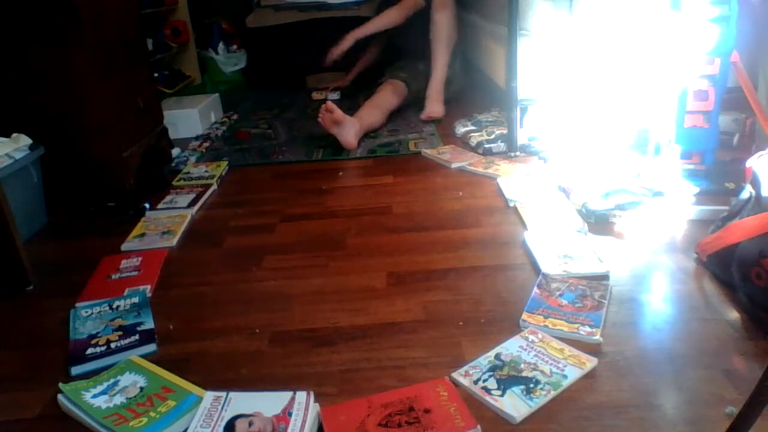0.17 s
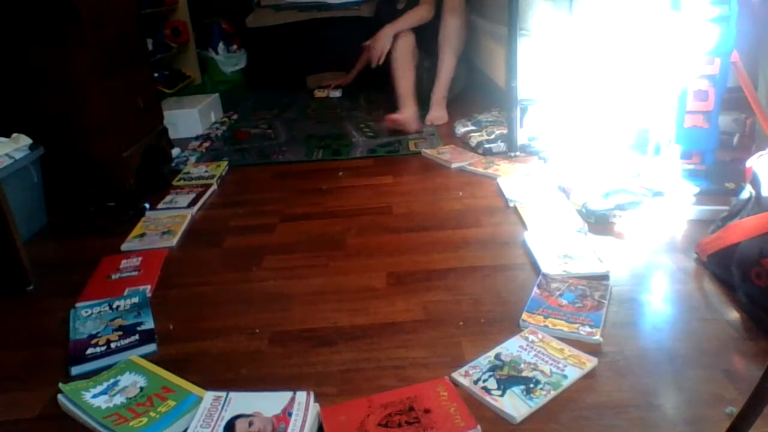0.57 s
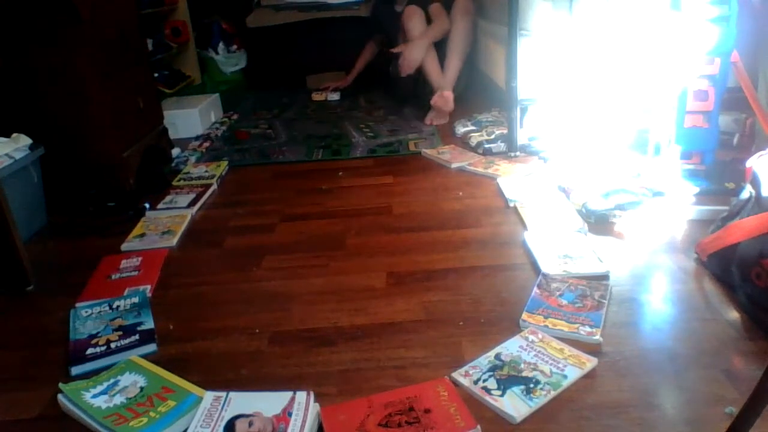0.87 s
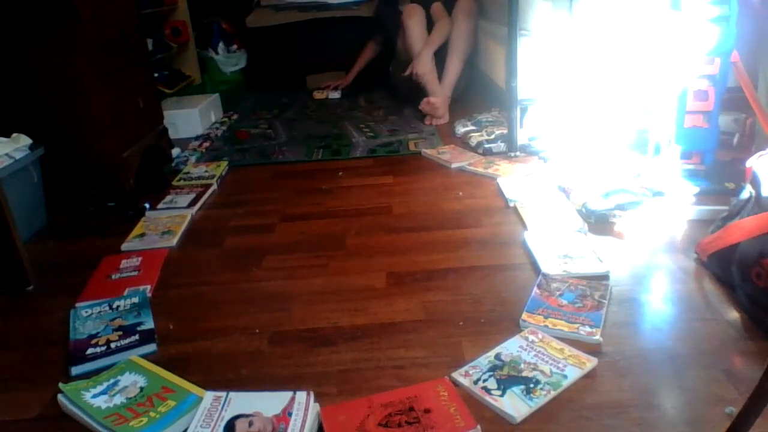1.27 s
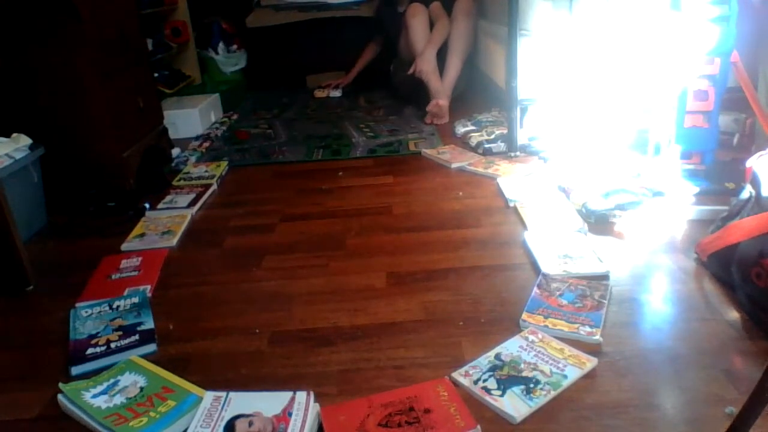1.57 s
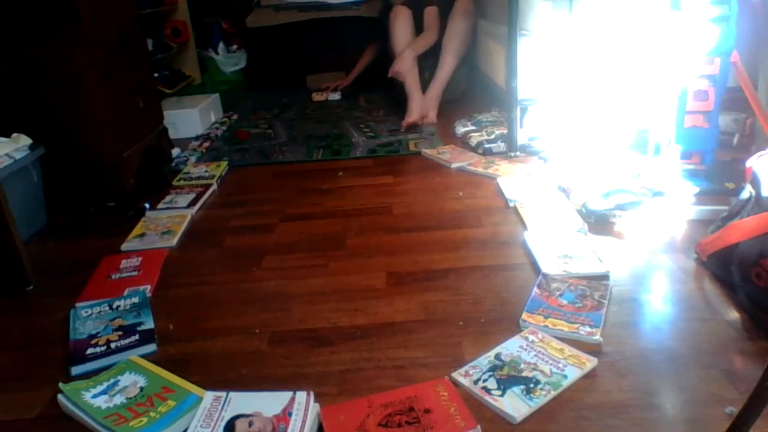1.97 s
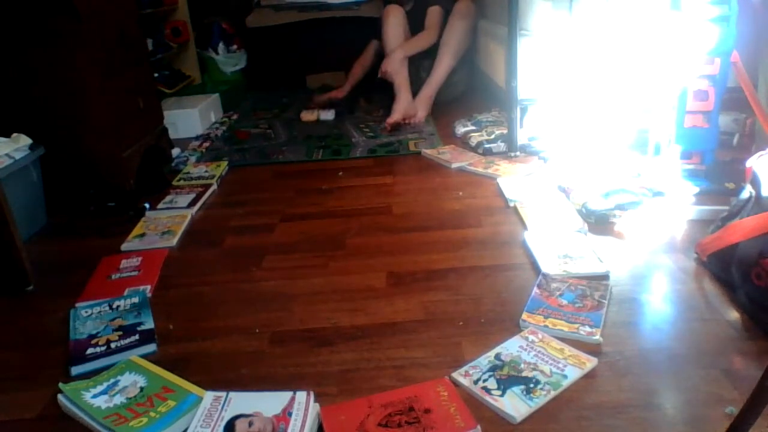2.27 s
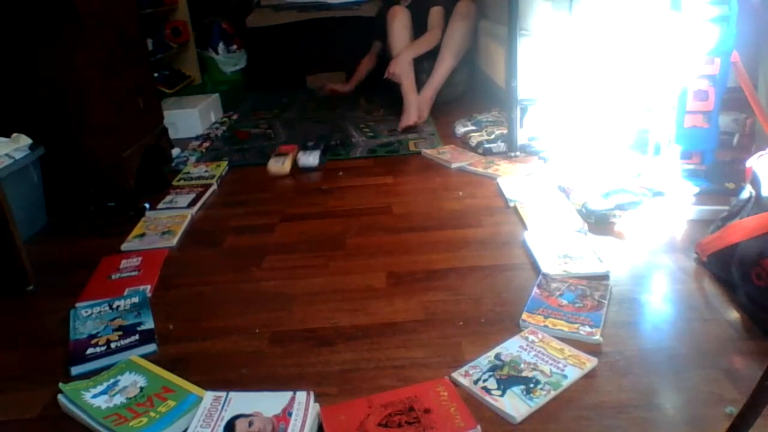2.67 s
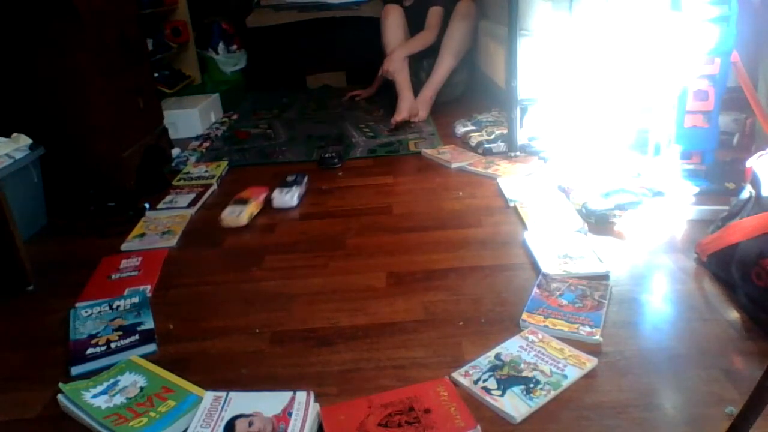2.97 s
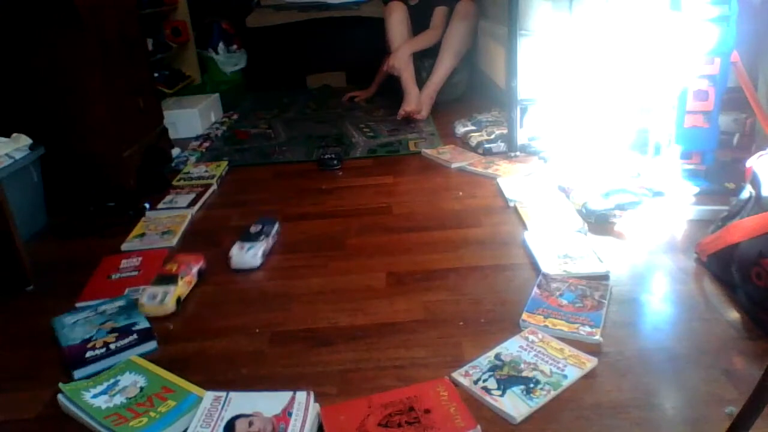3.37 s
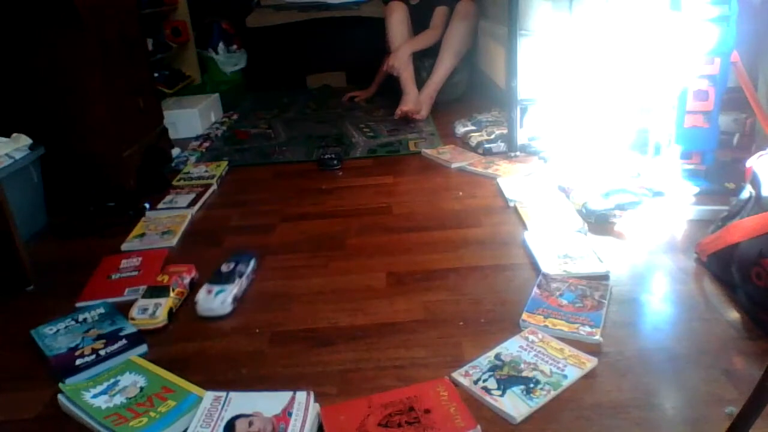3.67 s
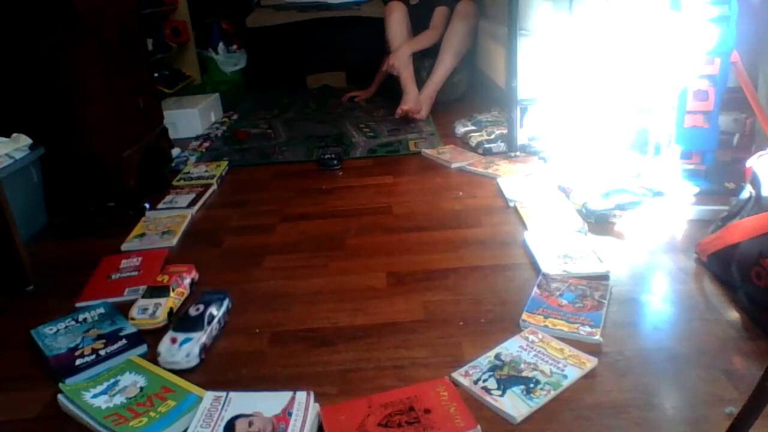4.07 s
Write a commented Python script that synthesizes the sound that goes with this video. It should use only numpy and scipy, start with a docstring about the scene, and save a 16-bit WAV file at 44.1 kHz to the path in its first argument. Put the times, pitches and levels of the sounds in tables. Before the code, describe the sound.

Two small metal toy cars click faintly on a rug, then roll rattling loudly across hollow hardwood and bump to a stop against books.

```python
"""Over a quiet room tone, two small metal toy cars are handled on a rug: ringing clacks, cloth rustle, floor sway.
Pushed off, they roll: random clicks of loose wheels excite the modes of axles, base, shell and hollow boards.
Off the rug the shell and boards speak louder, knocks bounce, planks flex and the floor panel booms.
At the end they bump against books and lurch to a stop. Sparse echoes give the small room throughout."""
import sys
import numpy as np
from scipy import signal
from scipy.io import wavfile
from scipy.ndimage import uniform_filter1d

SR = 44100
rng = np.random.default_rng(int(sys.argv[2]) if len(sys.argv) > 2 else 0)


def materialize(psi):
    """Save the field psi as 16-bit PCM at rate SR to the path in sys.argv[1].

    A 1-D psi becomes a single channel; in a 2-D psi each row is a channel.
    """
    bounded = np.clip(np.atleast_2d(psi).T, -1, 1)
    quanta = np.round(bounded * 32767).astype(np.int16)
    wavfile.write(sys.argv[1], SR, quanta)


def ratio_of_db(decibels):
    """Turn decibels (scalar or array-like) into linear amplitude factors; 0 dB maps to 1."""
    return 10 ** (np.asarray(decibels, float) / 20)


N = 185528


def evened(x):
    """Scales to rms 1."""
    return x / np.sqrt(np.mean(x ** 2) + 1e-20)


def drift(samples):
    """Slow random wander, rms 1: noise smoothed twice."""
    once = uniform_filter1d(rng.standard_normal(N), samples)
    return evened(uniform_filter1d(once, samples))


def follow(rows):
    """Columns of a curve table as gains per sample, silent outside the table."""
    s, *columns = np.transpose(rows)
    t = np.arange(N) / SR
    return [ratio_of_db(np.interp(t, s, column, left=-120, right=-120)) for column in columns]


def colour(x, points):
    """Causal minimum-phase filter with the given spectrum, interpolated over log frequency."""
    f, db = np.transpose(points)
    hz = abs(np.fft.fftfreq(16384, 1 / SR))
    curve_db = np.interp(np.log(hz + 1), np.log(f + 1), db)
    log_gain = np.log(ratio_of_db(np.maximum(curve_db, -100)))
    impulse = np.fft.ifft(np.exp(np.conj(signal.hilbert(log_gain)))).real[:8192]
    return signal.oaconvolve(x, impulse)[:N]


def ring(x, modes):
    """Modes that start softly and die away, struck by x; white noise keeps its rms."""
    t = np.arange(SR // 8) / SR
    impulse = np.zeros(len(t))
    for hz, width, db in modes:
        envelope = width ** 1.5 * t * np.exp(-np.pi * width * t)
        impulse += ratio_of_db(db) * envelope * np.sin(2 * np.pi * hz * t)
    return signal.oaconvolve(x, impulse / np.linalg.norm(impulse))[:N]


def chatter(per_s, spread_db, clump_db):
    """Random clicks of uneven size that come in clumps, rms 1."""
    size = ratio_of_db(spread_db * np.minimum(rng.exponential(1, N), 4)) * rng.choice([-1, 1], N)
    present = rng.random(N) < per_s / SR
    return evened(size * present * ratio_of_db(clump_db * drift(400)))


def rattle(x, modes, wander_db):
    """Each touch lands on another spot and loose parts meet in turn, so every mode comes and goes on its own."""
    out = np.zeros(N)
    for hz, width, db in modes:
        touch = x * rng.choice([-1, 1], N) * ratio_of_db(wander_db * drift(800))
        out += ratio_of_db(db) * ring(touch, [(hz, width, 0)])
    return out / np.linalg.norm([ratio_of_db(db) for _, _, db in modes])


def strikes(rows, modes, rise_s, t60_s, level_db):
    """Single clean strikes: a few modes start at once and die quickly, the higher ones sooner."""
    out, t = np.zeros(N + SR), np.arange(SR // 8) / SR
    rise = np.minimum(t / rise_s, 1)
    for s, db, hz in rows:
        rings = sum(ratio_of_db(part_db - 60 * k * t / t60_s) * np.sin(2 * np.pi * k * hz * t) for k, part_db in modes)
        out[round(s * SR):][:len(t)] += ratio_of_db(db + level_db) * rise * rings
    return out[:N]


# colour of the room hiss: [f/Hz, level/dB]
HISS_COLOUR = [(12, -6), (30, 5.5), (110, -10.5), (220, -17.5), (400, -24.5), (700, -24.5), (1400, -26),
               (3000, -38), (6000, -40), (14000, -27), (16500, -28)]
# faint hum: [f/Hz, level/dB]
HUM_TONES = [(178.6, -67)]


def room_tone():
    """Steady hiss of filtered noise and a faint sine hum."""
    t = np.arange(N) / SR
    hum = sum(np.sqrt(2) * ratio_of_db(db) * np.sin(2 * np.pi * hz * t) for hz, db in HUM_TONES)
    hiss = ratio_of_db(-56) * evened(colour(rng.standard_normal(N), HISS_COLOUR))
    return hiss, hum


# reverberation of the small room: [f/Hz, t60/s]
ROOM_DECAY = [(200, 0.63), (1000, 0.22), (4000, 0.2), (15000, 0.18)]


def tail(gap_s):
    """Sparse echoes of random sign, each band dying at its own speed."""
    echoes = np.zeros(SR // 2)
    at = np.arange(0, len(echoes) - 20, 20)
    echoes[at + rng.integers(0, 20, len(at))] = rng.choice([-1., 1.], len(at))
    hz, t, z = signal.stft(echoes, SR, nperseg=256)
    f, t60 = np.transpose(ROOM_DECAY)
    decay = np.maximum(np.interp(np.log(hz + 1), np.log(f), t60), .03)
    echoes = signal.istft(z * ratio_of_db(-60 * t / decay[:, None]), SR, nperseg=256)[1]
    return np.pad(echoes / np.linalg.norm(echoes), (round(gap_s * SR), 0))


def room(x, gap_s):
    """The cars move, so the echo pattern keeps changing: three tails take turns."""
    turn = np.arange(N) / SR * 7.0  # radians
    weights = [np.cos(turn) ** 2, np.sin(turn) ** 2, np.sin(2 * turn) / np.sqrt(2)]
    return sum(signal.oaconvolve(x * w, tail(gap_s))[:N] for w in weights)


# weight on the floor panel: [t/s, swing level/dB, upper mode's share level/dB]
PANEL_LOAD = [(1.75, -70, -19), (1.82, -67, 3), (1.91, -43.5, -11), (2.02, -34, 3.5), (2.04, -31.5, -5),
              (2.23, -25, -3), (2.32, -30.5, -1.5), (2.79, -29.5, -6), (2.81, -20, 1.5), (3.05, -29, -3.5),
              (3.1, -26.5, 4.5), (3.13, -34.5, 0.5), (3.35, -29, -0.5), (3.46, -43, -3),
              (4.14, -47.5, -5.5), (4.2, -61, -29)]
# floor panel modes: [f/Hz, width/Hz]
PANEL_MODES = [(42, 18.5), (85, 34.7)]
# planks carry more as the cars come near: [t/s, level/dB]
PLANK_CARRY = [(1.8, -8), (2.6, -7.5), (2.8, -5), (3.4, -9), (4.21, 9.5)]
# single planks flexing: [f/Hz, width/Hz, level/dB]
PLANK_MODES = [(151, 104, 7), (221.5, 57, -5.5), (229.5, 152, 5), (321, 82, -5.5)]


def floor_boom():
    """The uneven tread keeps the floor panel swinging near its two pitches and flexes the planks."""
    load, upper = follow(PANEL_LOAD)
    levels = [load * np.sqrt(np.maximum(1 - upper ** 2, .01)), load * upper]
    board_flurry = knocks()[0][3]
    flex = ratio_of_db(-14.5) * rolling() * follow(PLANK_CARRY)[0] + ratio_of_db(-12.5) * board_flurry
    out = flex * ring(rng.standard_normal(N), PLANK_MODES)
    for level, (hz, width) in zip(levels, PANEL_MODES):
        wandering_hz = hz + 0.293 * width * drift(1500)
        swing = np.sin(2 * np.pi * np.cumsum(wandering_hz) / SR)
        shudder = evened(ring(rng.standard_normal(N), [(hz, width, 0)]))
        out += level * (0.69 * swing + 0.64 * shudder)
    return out


# movement on the rug, also used by cars(): [t/s, hand jostling level/dB, sitter shifting weight level/dB]
RUG_MOVES = [(0.0, -53.5, -60), (0.058, -73, -55), (0.118, -60, -47), (0.2, -64, -54.5), (0.33, -62, -35.5),
             (0.444, -54, -40), (0.51, -66, -45.5), (0.64, -54, -49), (0.8, -64, -52), (0.966, -61, -45.5),
             (1.05, -58, -65), (1.134, -73, -48), (1.204, -60.5, -52), (1.55, -73, -59.5),
             (1.606, -58.5, -67), (1.7, -69.5, -53.5), (1.82, -55, -57), (1.95, -48, -48.5)]
# colour of cloth and feet on the rug: [f/Hz, level/dB]
RUSTLE_COLOUR = [(180, -68), (300, -39), (584, -2), (915, -33), (1250, 0), (1610, -8.5), (10900, -6.5),
                 (16000, -8.5)]
# colour of the floor's sway: [f/Hz, level/dB]
SWAY_COLOUR = [(4.7, -7.5), (8.0, 9.5), (28, -11), (65, -11), (92, -15.5), (150, -41), (160, -46),
               (210, -51), (350, -120)]
# heels shifting weight on the boards: [t/s, level/dB, f/Hz]
HEEL_THUDS = [(0.307, -27, 22), (0.40, -57, 13), (0.496, -36.5, 12.5), (0.607, -34.5, 23),
              (0.905, -36.5, 59), (1.055, -35.5, 19)]


def sitter():
    """Cloth and feet brush the rug as filtered clicks; shifting weight sways the floor as low noise and pulses."""
    hand, shift = follow(RUG_MOVES)
    rustle = ratio_of_db(-9.5) * hand + ratio_of_db(-13) * shift
    brush = rustle * evened(colour(chatter(12000, 0.98, 1.7), RUSTLE_COLOUR))
    heels, t = np.zeros(N), np.arange(N) / SR
    for s, db, hz in HEEL_THUDS:
        heels += ratio_of_db(db) * np.cos(2 * np.pi * hz * (t - s)) * np.exp(-(2.0 * hz * (t - s)) ** 2)
    sway = ratio_of_db(2.0) * shift * evened(colour(rng.standard_normal(N), SWAY_COLOUR))
    return brush, heels + sway


# the roll, then a slow creep once the wheels stall: [t/s, wheel chatter level/dB]
ROLL_LEVEL = [(1.8, -95), (1.95, -47.5), (2.03, -40), (2.08, -36.5), (2.14, -36.5), (2.29, -25.5),
              (2.5, -28), (2.59, -28), (2.69, -23.5), (2.73, -19), (2.8, -17.5), (2.84, -20.5),
              (2.89, -20.5), (3.05, -27.5), (3.15, -20.5), (3.22, -30), (3.44, -28.5), (3.495, -41.5),
              (4.0, -57), (4.21, -49)]
# last short lurches along the books: [start t/s, length/s, wheel chatter level/dB]
LAST_LURCHES = [(3.506, 0.073, -42), (3.646, 0.088, -38.5), (3.82, 0.023, -34), (3.889, 0.027, -38),
                (4.069, 0.013, -40.5), (4.142, 0.0086, -31)]


def rolling():
    """Wheel chatter level: the long roll, then lurches that start fast, hold and die away."""
    rise_s, fade_db_per_s = 0.0036, 351
    t, level = np.arange(N) / SR, follow(ROLL_LEVEL)[0]
    for s, length, db in LAST_LURCHES:
        rise = np.clip((t - s) / rise_s, 0, 1)
        level = level + rise * ratio_of_db(db - fade_db_per_s * np.maximum(t - s - length, 0))
    return level


# knocks of wheels and axles, felt in the chassis:
# [t/s, jingle level/dB, body level/dB, board level/dB, bounce t60/s]
WHEEL_KNOCKS = [(0.105, -37, -40.5, -75, 0.14), (0.426, -46, -42, -59, 0.19),
                (0.5468, -36.5, -46, -70, 0.41), (0.6412, -32.5, -38, -70, 0.056),
                (0.683, -43, -41.5, -49, 0.24), (0.896, -44, -41, -69, 0.23),
                (0.9373, -63, -45.5, -78, 0.51), (1.0765, -35, -44, -48, 0.12), (1.159, -62, -51, -60, 0.4),
                (1.206, -63, -63, -50, 0.16), (1.256, -59, -53, -55, 0.46),
                (1.426, -64.5, -49.5, -70, 0.14), (1.6024, -44, -53, -54, 0.15),
                (1.801, -39.5, -46.5, -65, 0.58), (1.8865, -40, -53, -72, 0.11),
                (2.013, -52, -32, -70, 0.61), (2.1087, -22.5, -53, -25.5, 0.16),
                (2.177, -45, -35, -31, 0.29), (2.2819, -15.5, -22, -62, 0.44),
                (2.395, -21.5, -20.5, -60, 0.93), (2.5215, -16.5, -18, -26, 0.33),
                (2.609, -33, -23.5, -33, 0.37), (2.6748, -9.5, -27, -31, 0.11),
                (2.7095, -14, -13.5, -31, 0.2), (2.7342, -2, -48, -13.5, 0.14),
                (2.7974, -4, -15, -20.5, 0.42), (2.828, -18, -33, -41, 0.091),
                (2.8674, -3, -16.5, -9, 0.064), (2.8794, -13, -22, -45, 0.52),
                (2.9263, -20.5, -20.5, -23.5, 1), (3.0086, -13.5, -27, -27, 0.089),
                (3.0566, -7, -18, -19, 0.036), (3.097, -7, -18, -18, 0.075),
                (3.1392, -10.5, -15.5, -23, 0.21), (3.1745, -12.5, -30, -14.5, 0.25),
                (3.2092, -13, -45, -38, 0.033), (3.255, -21.5, -26.5, -27.5, 0.82),
                (3.3374, -21, -19.5, -18, 0.065), (3.375, -17.5, -32, -25, 0.22)]
# bumps against the books, felt in the shell: same columns
# [t/s, jingle level/dB, body level/dB, board level/dB, bounce t60/s]
BOOK_BUMPS = [(3.502, -17.5, -24, -36, 0.24), (3.5448, -17.5, -27, -33, 0.12),
              (3.5666, -16.5, -30, -55, 0.11), (3.6478, -18, -26.5, -37, 0.083),
              (3.6555, -17.5, -39, -34, 0.2), (3.6999, -15.5, -29, -31, 0.2),
              (3.7119, -14, -25.5, -42, 0.031), (3.79, -31, -31.5, -35, 0.064),
              (3.8252, -20.5, -35, -38, 0.27), (3.8353, -4.5, -45, -41, 0.017),
              (3.893, -22, -35, -32, 0.05), (3.8979, -11, -27, -38, 0.14), (4.0555, -23.5, -32, -38, 0.075),
              (4.079, -18.5, -38, -52, 0.1), (4.1433, -34, -40, -19, 0.048), (4.149, -4, -22.5, -54, 0.087)]


def knocks():
    """Each knock is a blow and a dying flurry of bounces; the loose axles take a moment to join in."""
    # four rows: jingle, chassis, shell, boards
    flurries, blows, t = np.zeros((4, N + SR)), np.zeros((4, N + SR)), np.arange(SR // 2) / SR
    rise = np.minimum(t / np.array([[.003], [.001], [.001], [.002]]), 1)
    # the other half of the body feels less
    for rows, chassis_db, shell_db in [(WHEEL_KNOCKS, 0, -8), (BOOK_BUMPS, -5, 0)]:
        for s, jingle_db, body_db, board_db, t60 in rows:
            peaks = ratio_of_db(np.array([jingle_db, body_db + chassis_db, body_db + shell_db, board_db]))
            fall = 0.24 * ratio_of_db(-60 * t / 0.0054) + .5 * ratio_of_db(-60 * t / t60)
            flurries[:, round(s * SR):][:, :len(t)] += peaks[:, None] * rise * fall
            blows[:, round(s * SR)] += peaks
    return flurries[:, :N], blows[:, :N]


# one axle pings alone when its wheel snaps against the frame: [t/s, level/dB]
AXLE_PINGS = [(1.8821, -44), (2.081, -34), (2.2817, -14), (2.3885, -24), (2.5287, -24), (2.7363, -9),
              (2.7936, -11), (2.8265, -12), (2.9856, -32), (3.1393, -19), (3.507, -29), (3.658, -27),
              (3.7125, -22), (3.8347, -30), (3.8981, -28), (4.1487, -15)]


def pings():
    """A snap with a few quick rebounds rings the highest axle mode."""
    t60_s, hz, width_hz = 0.048, 14450, 2000
    snaps, t = np.zeros(N + SR), np.arange(SR // 8) / SR
    for s, db in AXLE_PINGS:
        snaps[round(s * SR):][:len(t)] += ratio_of_db(db - 60 * t / t60_s)
    return ratio_of_db(-1.0) * ring(snaps[:N] * chatter(3400, 1.3, 1.1), [(hz, width_hz, 0)])


# wheels thump single boards: [t/s, level/dB, f/Hz]
BOARD_THUMPS = [(1.21, -50, 645), (1.604, -44, 673), (1.613, -49, 650), (2.112, -35, 550),
                (2.304, -22, 650), (2.399, -32, 570), (2.511, -22, 520), (2.609, -33, 566),
                (2.715, -9, 576), (2.765, -17, 630), (2.801, -7.5, 577), (2.811, -28, 597),
                (2.838, -36, 574), (2.867, -10, 670), (2.884, -17, 560), (2.95, -16, 573),
                (2.994, -15, 524), (3.049, -27, 643), (3.075, -13, 584), (3.097, -15, 520),
                (3.118, -19, 573), (3.14, -35, 590), (3.161, -22, 626), (3.204, -15, 610), (3.3, -19, 463),
                (3.333, -20, 587), (3.378, -44, 620), (3.416, -17, 541), (3.507, -31, 600),
                (3.548, -25.5, 600), (3.64, -31, 644), (3.702, -20, 615), (3.894, -25, 570),
                (4.084, -29, 566), (4.143, -35, 570)]
# partials of a thumped board: [multiple of f, level/dB]
THUMP_PARTIALS = [(0.998, 1.5), (1.17, -14)]


def thumps():
    """Each wheel thump rings two close modes of a board."""
    return strikes(BOARD_THUMPS, THUMP_PARTIALS, rise_s=0.0022, t60_s=0.038, level_db=-5)


# sharp clacks of body on base: [t/s, level/dB, f/Hz]
BODY_CLACKS = [(.109, -52, 1270), (.434, -36, 1180), (.312, -47, 1240), (.366, -42, 1210),
               (.447, -41, 1300), (.607, -46, 1560), (.6425, -40, 1340), (.651, -38, 940),
               (.659, -50, 1370), (.661, -51, 3070), (.6844, -45, 1420), (.696, -43, 2310),
               (.704, -41, 1230), (.726, -44, 1350), (.74, -48, 890), (.800, -45, 1250), (.838, -52, 1300),
               (.871, -55, 1240), (.884, -44, 1300), (.897, -33, 1255), (.916, -48, 1560),
               (.937, -40, 1270), (.947, -35.5, 1220), (.957, -41, 1270), (.971, -39, 1300),
               (1.0765, -43, 2470), (1.082, -43, 2980), (1.176, -54, 2550), (1.257, -53, 2600),
               (1.356, -48, 1410), (1.43, -48, 1400), (1.562, -54, 2540), (1.622, -51, 1510),
               (1.16, -48, 2590), (1.208, -40, 1230), (1.427, -55, 2600), (1.603, -46, 1380),
               (1.886, -31, 1290), (2.016, -25, 1450), (2.021, -34, 1560), (2.032, -25, 1560),
               (2.033, -37, 2600), (2.046, -33, 1490), (2.048, -32, 3080), (2.056, -31, 1560),
               (2.102, -33, 1550), (2.172, -31, 3350), (2.222, -27, 1300), (2.233, -30, 1420),
               (2.266, -19, 1490), (2.298, -32, 1440), (2.312, -17, 1300), (2.322, -21, 1480),
               (2.36, -36, 1400), (2.378, -26, 1480), (2.089, -29, 1560), (2.146, -39, 1330),
               (2.17, -33, 1300), (2.208, -28, 1330), (2.25, -24, 1210), (2.283, -27, 1520),
               (2.396, -23, 1100), (2.474, -16, 1170), (2.524, -22, 1170), (2.532, -27, 3080),
               (2.622, -31, 1140), (2.631, -19, 3260), (2.694, -13.5, 1820), (2.7115, -12, 1300),
               (2.7223, -31, 1270), (2.732, -16, 3400), (2.778, -19, 3400), (2.798, -17, 3400),
               (2.8006, -11, 1300), (2.812, -19, 1300), (2.84, -21, 1450), (2.866, -19, 4810),
               (3.093, -19, 4850), (3.144, -22, 4880), (3.19, -19, 3040), (3.223, -20, 1950),
               (3.26, -23, 4950), (3.339, -23, 3470), (3.362, -22, 1500), (3.375, -24, 5000),
               (3.428, -25, 1920), (3.459, -28, 1900), (3.463, -31, 1400), (3.503, -28, 3770),
               (3.5025, -28, 5100), (3.648, -26, 5000), (3.649, -35, 3770), (3.712, -28, 4950),
               (2.822, -12, 1370), (2.823, -11, 3370), (2.866, -12, 1560), (2.881, -19, 1460),
               (2.889, -13, 2480), (2.926, -10, 1190), (3.0075, -15, 1220), (3.018, -17, 1640),
               (3.057, -16, 1520), (3.118, -16.5, 1480), (3.132, -16, 1480), (3.165, -11.5, 2060),
               (3.1435, -10, 1503), (3.152, -19.5, 2920), (3.183, -14.5, 1103), (3.261, -18, 2050),
               (3.298, -15.5, 1485), (3.3454, -19.5, 1900), (3.376, -25, 2140), (3.407, -23, 1900),
               (3.5022, -20, 2140), (3.5105, -30, 2090), (3.5448, -18.5, 2220), (3.5544, -27, 2260),
               (3.5675, -30, 2150), (3.524, -25, 1980), (3.535, -29, 1900), (3.562, -31, 3160),
               (3.569, -25.5, 3160), (3.578, -28, 1300), (3.589, -30, 1550), (3.607, -37, 1900),
               (3.682, -25, 1900), (3.708, -31, 2060), (3.724, -34, 1900), (3.743, -35, 1850),
               (3.648, -19.5, 2170), (3.657, -23, 2130), (3.6697, -25, 1900), (3.6985, -27, 2080),
               (3.716, -27.5, 3160), (3.7902, -26.5, 1960), (3.7995, -29, 2070), (3.8256, -25, 2160),
               (3.8352, -24, 2140), (3.848, -32, 2100), (3.859, -33, 2200), (3.879, -34, 2150),
               (3.900, -39, 2000), (3.924, -35, 1290), (3.936, -34, 1260), (3.982, -47, 1340),
               (4.037, -44, 2070), (4.088, -29, 1346), (4.109, -36, 1300), (4.128, -68, 1370),
               (4.168, -26, 2060), (4.172, -29, 1040), (4.184, -26, 1900), (3.911, -25, 1630),
               (3.916, -23.5, 1300), (4.056, -25.5, 1980), (4.0655, -29, 2030), (4.080, -28, 2270),
               (4.098, -33.5, 1300), (4.1495, -24, 1620), (4.157, -25, 2050), (4.160, -24.5, 1030),
               (4.198, -25, 1630)]
# partials of a clack: [multiple of f, level/dB]
CLACK_PARTIALS = [(1, -0.5), (1.13, -11), (1.62, -18), (2.7, -9.5)]


def clacks():
    """Body claps on base, each clack ringing at the pitch of the spot where it was struck."""
    return strikes(BODY_CLACKS, CLACK_PARTIALS, rise_s=.0007, t60_s=.038, level_db=-3.5)


# bare click of metal on metal: [f/Hz, level/dB]
TICK_COLOUR = [(1000, -47), (2400, -4.5), (4500, -2.5), (7000, 0), (11000, 2), (14000, -6.5), (15300, -18),
               (16500, -3)]
# first touch of a knock: [f/Hz, level/dB]
CRACK_COLOUR = [(600, -40), (1500, -15), (2500, -38), (5500, 12.5), (12000, -26)]
# axle modes: [f/Hz, width/Hz, level/dB]
AXLE_MODES = [(4900, 1300, -4), (6300, 1400, -6), (7800, 1400, -4), (9700, 1200, -1), (11200, 1400, -3),
              (12800, 1300, -2), (14800, 1100, 1.5)]
# lower modes of the base: [f/Hz, width/Hz, level/dB]
CHASSIS_MODES = [(1064, 700, -4), (1170, 69, -8), (1300, 150, -5.5), (1460, 105, -5.5), (1560, 133, -5)]
# upper modes of the base: [f/Hz, width/Hz, level/dB]
FRAME_MODES = [(2353, 650, -2), (2600, 510, -2), (3068, 280, -1.5), (3377, 280, -6.5), (3290, 2900, 1)]
# shell modes: [f/Hz, width/Hz, level/dB]
SHELL_MODES = [(1900, 300, 1.5), (2070, 65, -9.5), (2170, 270, -4), (3160, 75, -13), (3950, 780, -5.5),
               (4950, 360, -8.5)]
# hollow boards under the wheels: [f/Hz, width/Hz, level/dB]
HOLLOW_MODES = [(790, 270, -7), (594, 337, 12.5), (668, 107, 5.5), (650, 270, 3.5)]
# the base rings freely at speed, less when held or pressed to the books; the shell turns towards
# the microphone late: [t/s, upper base level/dB, shell level/dB]
FREEDOM = [(0, -4.5, 0), (.7, -7.5, 1), (1.2, -8.5, -1), (1.9, -8, -1), (2.1, -2, -8), (2.3, -5, -1.5),
           (2.7, -7, -1.5), (3.0, -4, -3), (3.3, -4.5, 2.5), (3.5, -6, -1), (3.8, -13.5, 0), (4.21, -5, 0)]


def cars():
    """Wheel chatter and knocks strike chassis, shell, boards and axles."""
    on_rug = np.arange(N) / SR < 2.7  # the rug damps shell and boards
    # all wheels lighten and press together over the grain of the wood
    roll = ratio_of_db(1.05 * drift(300)) * rolling()
    jingle, chassis = ratio_of_db(-1.9) * roll, ratio_of_db(-3.5) * roll
    shell, hollow = ratio_of_db(-8.5 - 4 * on_rug) * roll, ratio_of_db(-6.5 - 9.5 * on_rug) * roll
    handled = follow(RUG_MOVES)[0]
    base_free, shell_free = follow(FREEDOM)

    flurries, blows = knocks()
    wheels, bounces = chatter(800, 1.94, 0.5), chatter(4000, 1.56, 0.53)
    hits = flurries * bounces + ratio_of_db(np.array([[3.0], [14.0], [16.0], [15.0]])) * blows

    shake = ratio_of_db(-5.5) * jingle * chatter(6600, 1.0, 2.6) + ratio_of_db(-7.0) * hits[0]
    ticks = 0.74 * colour(shake, TICK_COLOUR) / np.std(colour(wheels, TICK_COLOUR))
    axles = .55 * rattle(shake, AXLE_MODES, 3.5)
    cracks = ratio_of_db(9.5) * colour(.2 * blows[1] + blows[2], CRACK_COLOUR)

    base_drive = ratio_of_db(-4.5) * (chassis + handled) * wheels + ratio_of_db(-3.5) * hits[1]
    base = ratio_of_db(-1.5) * rattle(base_drive, CHASSIS_MODES, 2.47)
    frame = rattle(base_drive * base_free, FRAME_MODES, 3.9)
    shell_drive = (shell + ratio_of_db(-27.0) * handled) * wheels + ratio_of_db(-3.5) * hits[2]
    shell_ring = rattle(shell_free * shell_drive, SHELL_MODES, 0.81)
    board_drive = (ratio_of_db(-10.0) * hollow + ratio_of_db(-11.5) * handled) * wheels + ratio_of_db(-7.0) * hits[3]
    boards = rattle(board_drive, HOLLOW_MODES, 1.33)
    return ticks + axles + cracks + base + frame + shell_ring + boards


# left-right difference against the sum: [f/Hz, level/dB]
PORT_SPREAD = [(30, -21), (60, -27), (90, -42), (180, -20.5), (700, -12), (1400, -5), (2800, 2),
               (5500, 6.5), (9000, 4.5), (16000, 5.5)]


def scene():
    """Two close ports hear the bass nearly alike and differ more as the pitch rises; the right one hears first."""
    boom = floor_boom()
    brush, sway = sitter()
    hiss, hum = room_tone()
    near = cars() + thumps() + clacks() + pings() + brush
    total = ratio_of_db(-0.5) * near + ratio_of_db(-9.0) * room(near, .003) + boom + sway + hiss + hum
    # floor sway reaches the two ports a little differently: a copy shifted by 3000 samples
    floor_other = ratio_of_db(-1.5) * np.roll(boom + sway, 3000)
    other = ratio_of_db(-7.5) * room(near, 0.00076) + floor_other + hiss[::-1]
    lead = .3 * np.gradient(total)  # moves each port by about 0.3 samples
    difference = colour(other, PORT_SPREAD) - lead
    return np.array([total + difference, total - difference])


def narrow(pair):
    """Above a set pitch, quiet bands of the left-right difference fold to the centre, block by block."""
    above_hz, under_db = 6560, -66.5
    total, difference = (pair[0] + pair[1]) / 2, (pair[0] - pair[1]) / 2
    hz, _, z = signal.stft(difference, SR, nperseg=2048)
    band = (hz // 700).astype(int)
    power = np.array([(abs(z[band == b]) ** 2).mean(0) for b in range(band[-1] + 1)])
    level_db = 10 * np.log10(power + 1e-20)
    # a random wander makes the treble width flicker
    wander_db = 12.8 * evened(uniform_filter1d(rng.standard_normal(level_db.shape), size=4, axis=1))
    kept = np.clip((level_db + wander_db - under_db) / 2, 0, 1)[band]
    z = z * np.where(hz[:, None] > above_hz, kept, 1)
    difference = signal.istft(z, SR, nperseg=2048)[1][:N]
    return np.array([total + difference, total - difference])


def band_limit(x):
    """A steep low-pass at the top of the band."""
    return signal.sosfilt(signal.butter(12, 16650, fs=SR, output="sos"), x)


def record(dry):
    """Band limit at 15.8 kHz, then stereo narrowing."""
    edge = signal.firwin(511, 15800, window=("kaiser", 9), fs=SR)
    mix = narrow(signal.oaconvolve(dry, edge[None], "same"))
    return band_limit(mix)


dry = scene()
out = record(dry)
materialize(out)
```